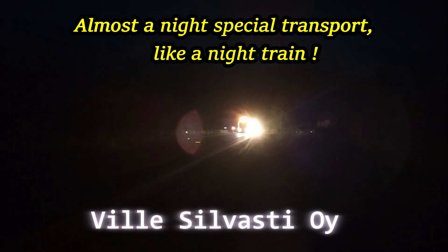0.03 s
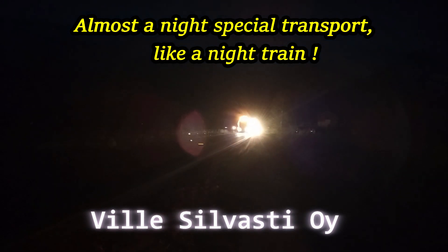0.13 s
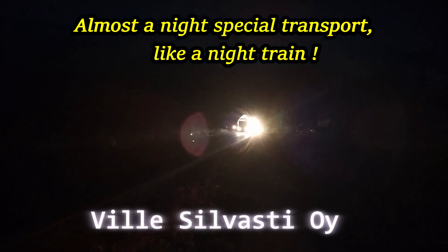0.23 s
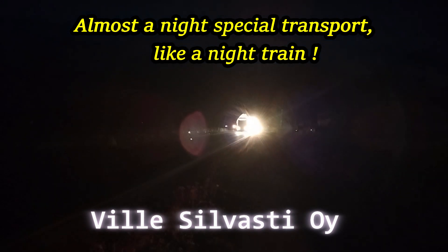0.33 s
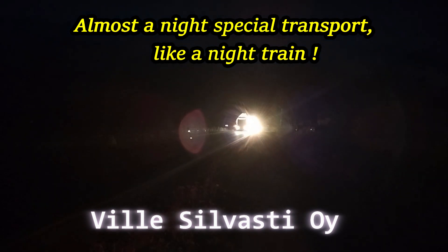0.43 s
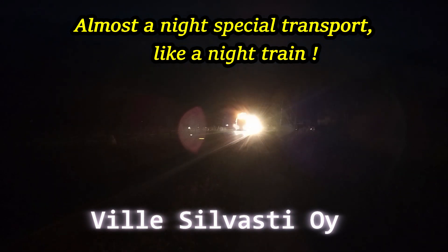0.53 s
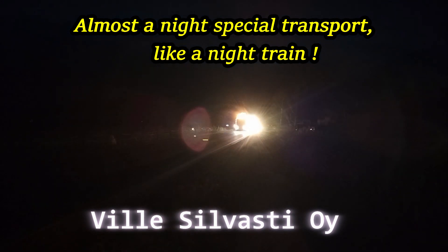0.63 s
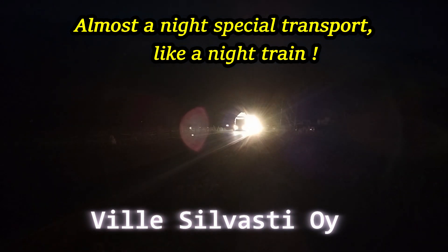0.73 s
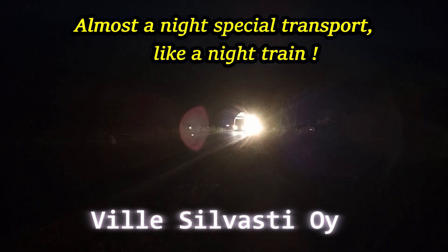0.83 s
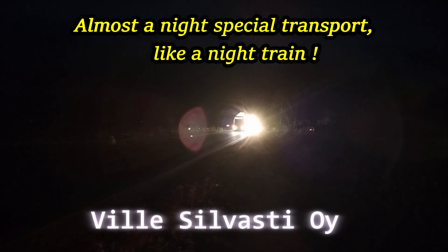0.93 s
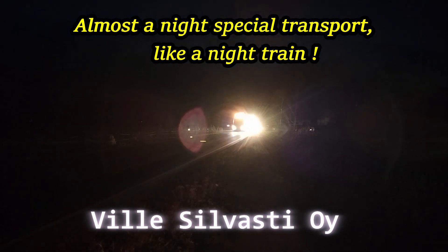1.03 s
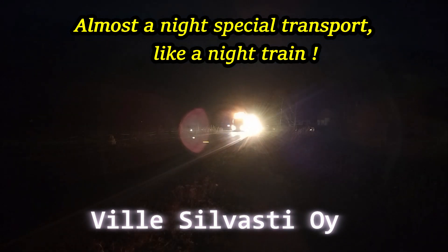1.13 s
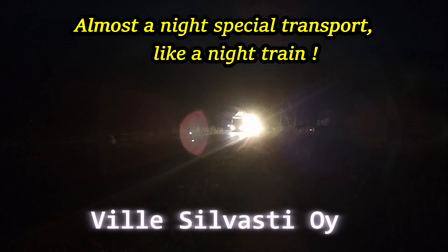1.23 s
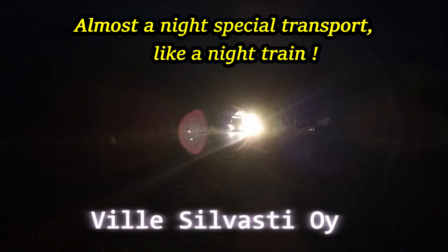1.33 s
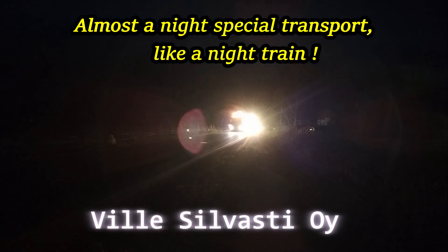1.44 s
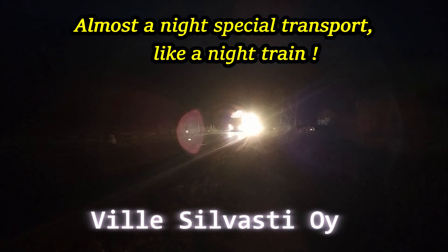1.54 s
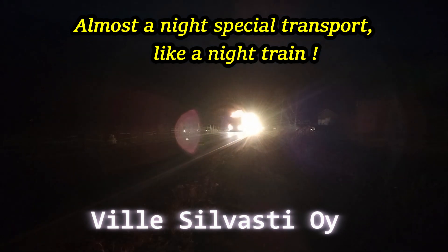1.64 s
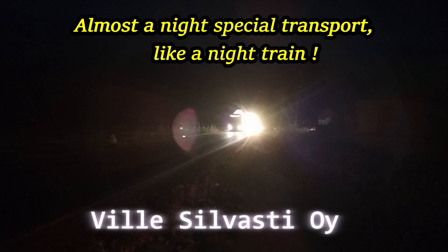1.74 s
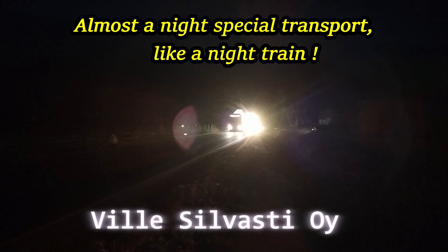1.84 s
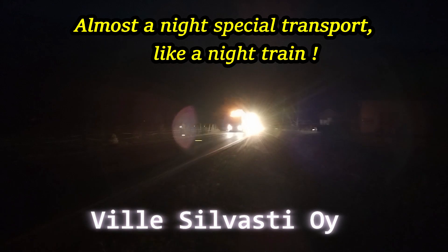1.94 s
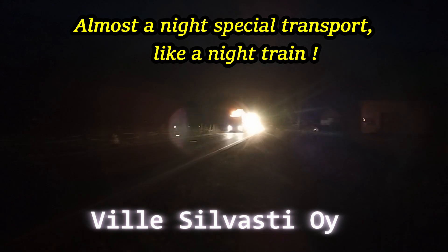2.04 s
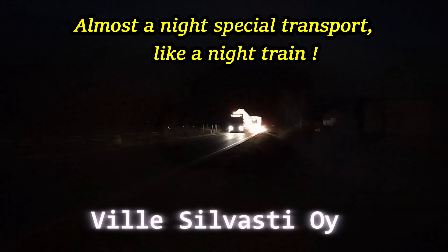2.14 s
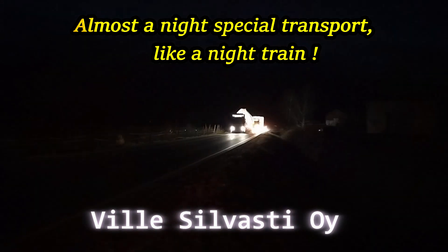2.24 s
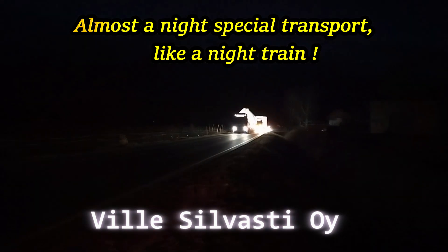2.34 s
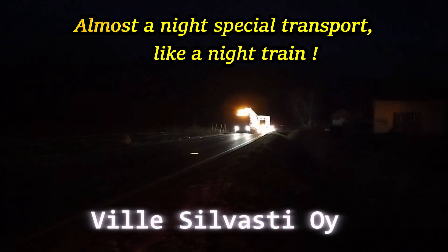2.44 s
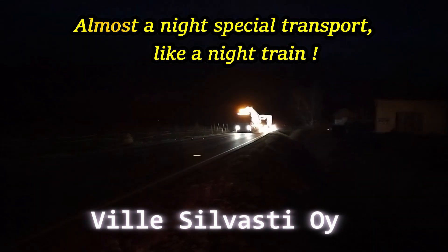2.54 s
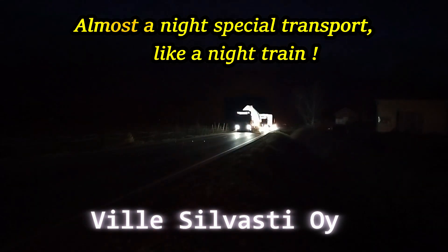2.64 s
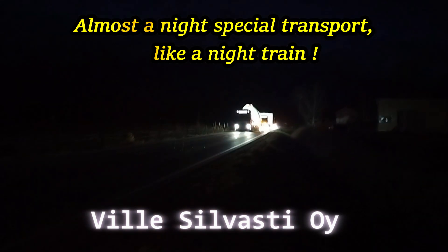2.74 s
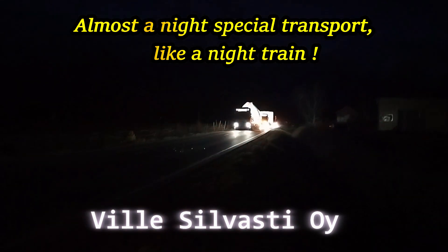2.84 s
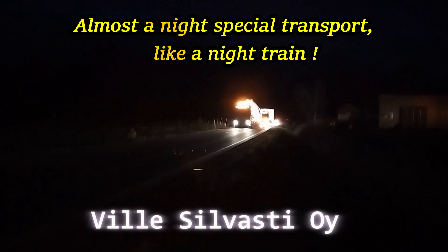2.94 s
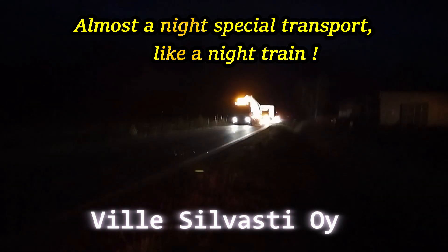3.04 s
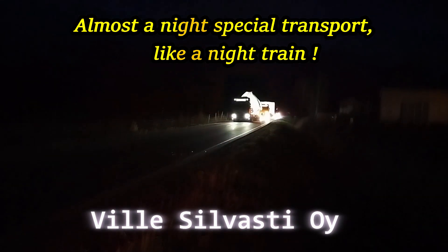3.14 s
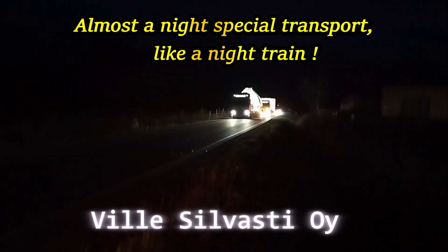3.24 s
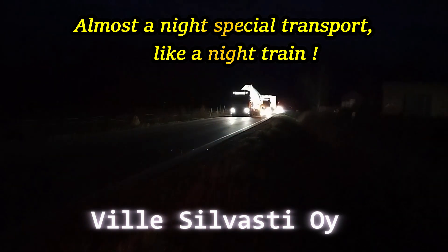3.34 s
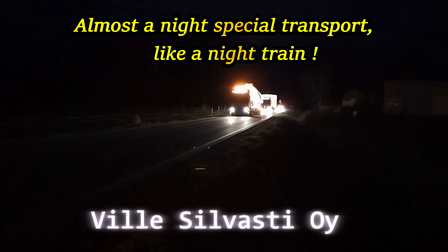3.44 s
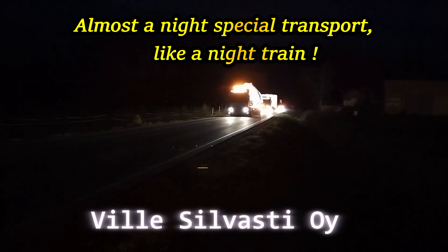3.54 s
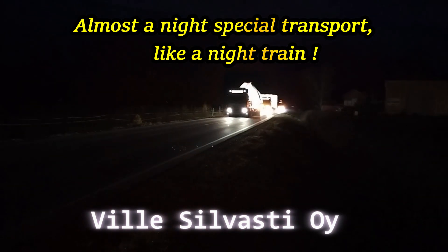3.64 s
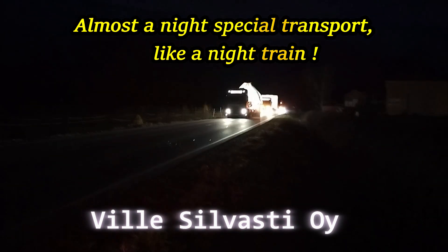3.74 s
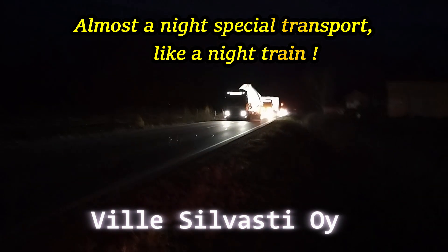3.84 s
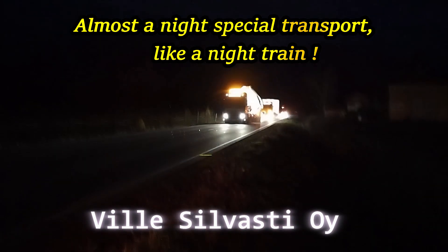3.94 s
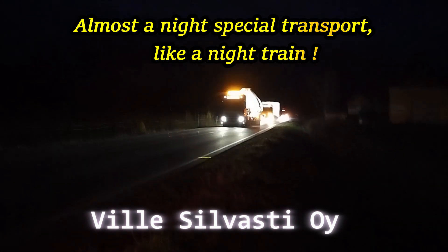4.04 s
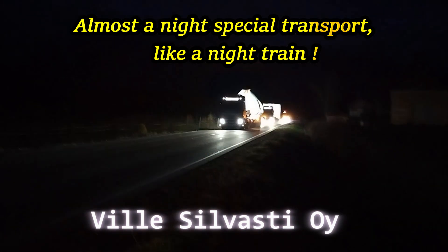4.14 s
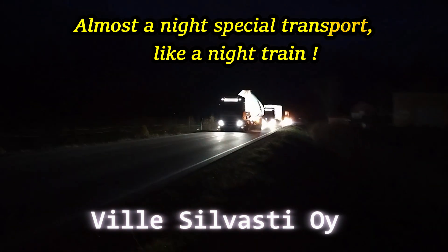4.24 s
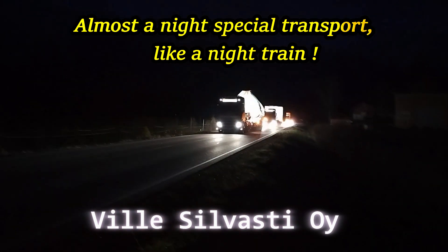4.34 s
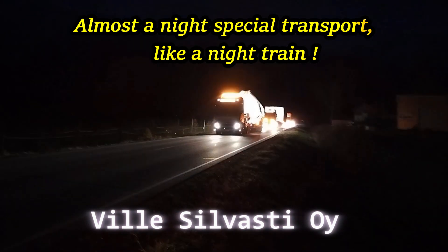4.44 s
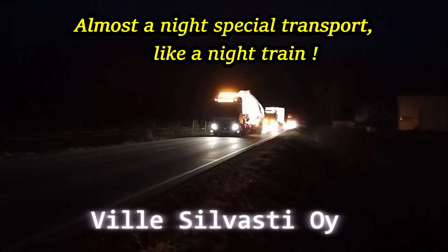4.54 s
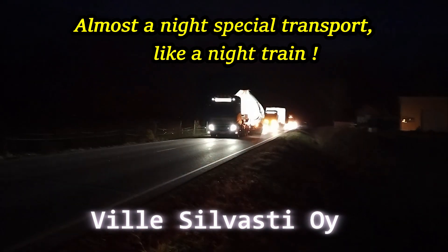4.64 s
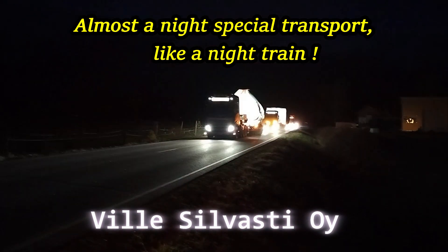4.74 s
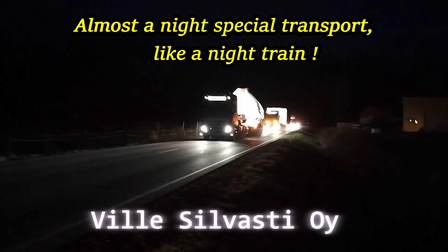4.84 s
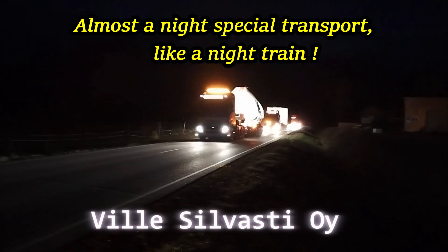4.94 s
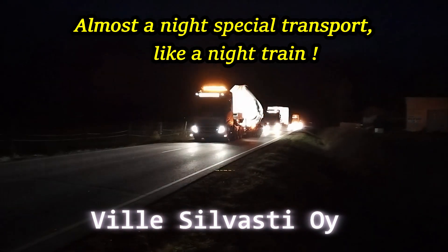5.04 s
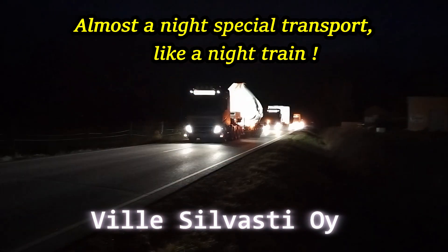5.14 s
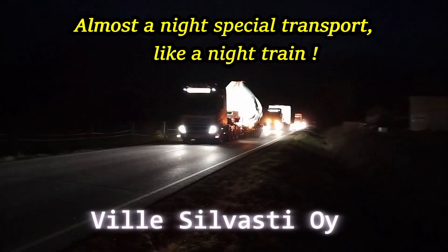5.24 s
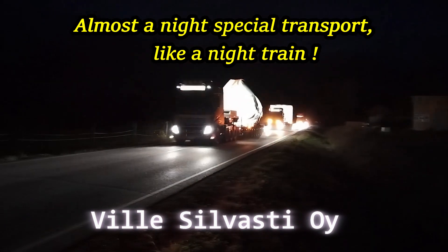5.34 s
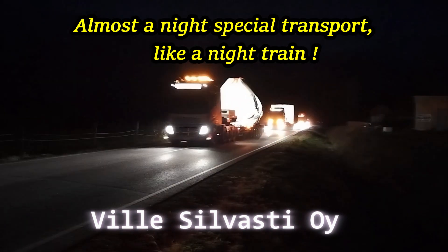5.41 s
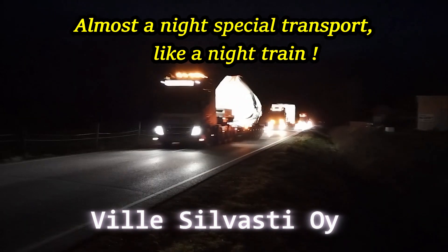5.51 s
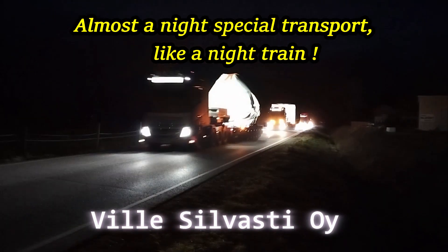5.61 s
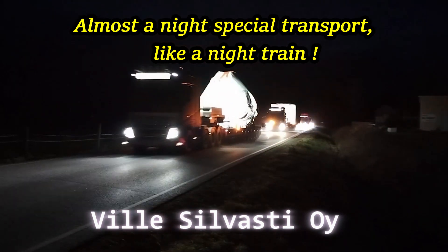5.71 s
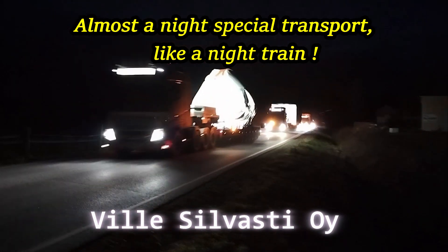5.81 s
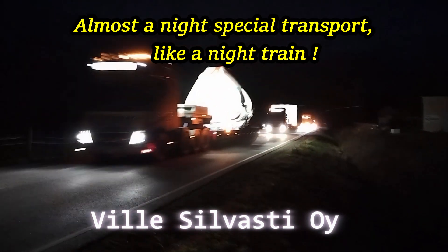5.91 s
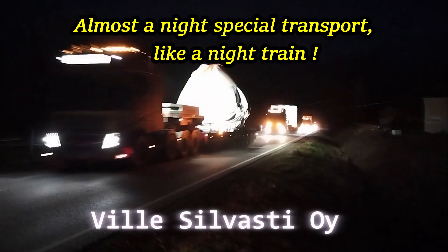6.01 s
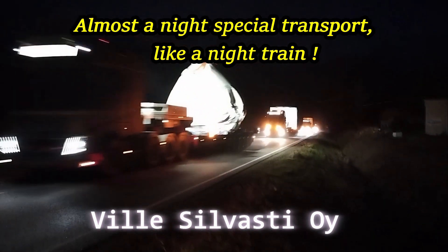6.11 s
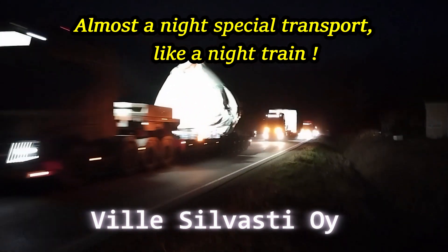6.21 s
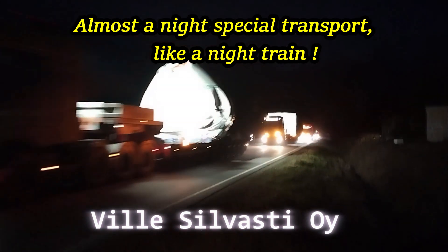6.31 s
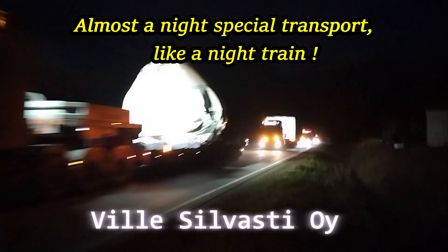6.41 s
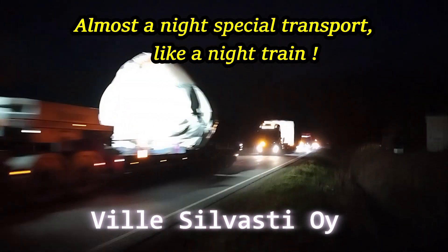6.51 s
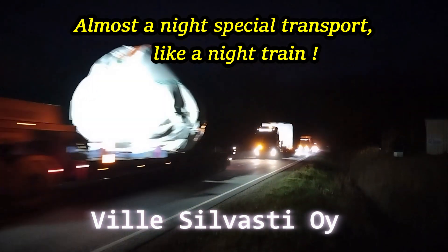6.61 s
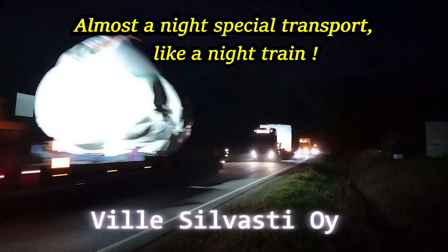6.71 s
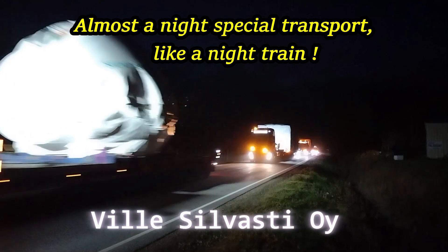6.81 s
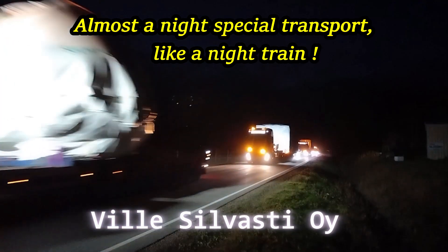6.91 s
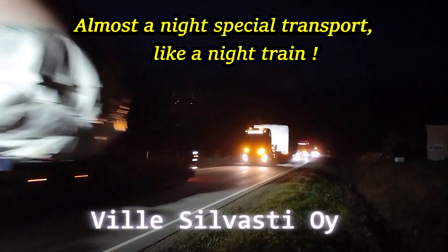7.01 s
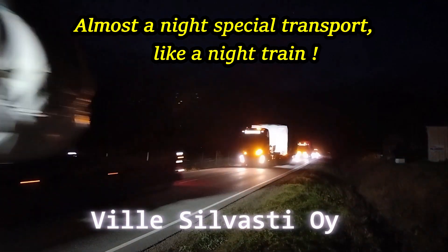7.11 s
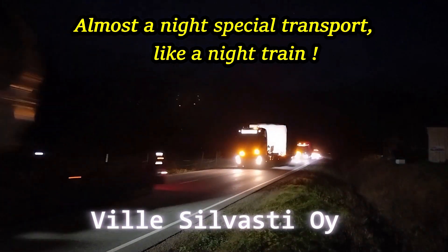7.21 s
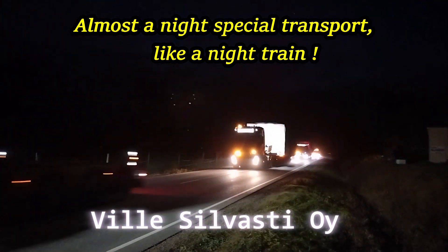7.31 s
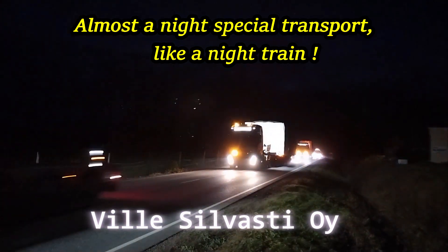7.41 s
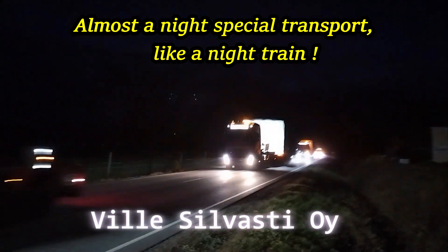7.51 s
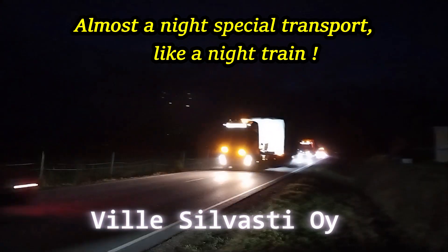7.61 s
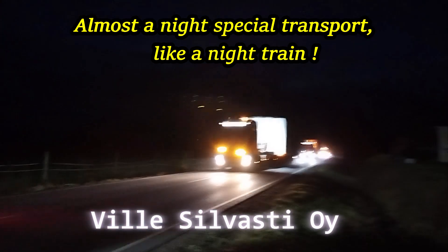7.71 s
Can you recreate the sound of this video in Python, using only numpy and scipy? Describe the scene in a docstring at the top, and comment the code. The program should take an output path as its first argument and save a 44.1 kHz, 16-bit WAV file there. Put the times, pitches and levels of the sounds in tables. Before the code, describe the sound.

Outdoors beside a country road, a handheld stereo microphone picks up distant vehicle roar, faint hiss and fluttering breeze with low wind thumps. A heavy truck with an oversized load grows steadily louder, its tyres roaring and hissing on asphalt. It rushes past very close and swings left, with tyre whine, brief whistles and a thin squeak falling in pitch, then its wake tears noisily across the microphone.

```python
"""A heavy truck with an oversized load approaches on a country road at night: shaped noise for its tyres,
Doppler-shifted sines for its hum, over the steady roar of vehicles far behind and the microphone's hiss. A
freshening breeze flutters at two microphone ports as modulated noise; single eddies thump them as pulses. Then
the tread whines as a harmonic series, stones tick, and wheel whistles and a trailer squeak sink in pitch. Last,
the load's wake strikes the ports as buffeting noise and short bursts while the truck's level dips sharply."""
import sys
import numpy as np
from scipy.fft import rfft, irfft, next_fast_len
from scipy.io import wavfile
from scipy.ndimage import map_coordinates

SR = 44100
rng = np.random.default_rng(int(sys.argv[2]) if len(sys.argv) > 2 else 0)


def unload_audio(sound):
    """Save the sound as a 16-bit wav file, at the path given as the first command line argument."""
    columns = np.transpose(np.atleast_2d(sound))
    # keep every value between -1 and 1, then stretch to whole-number steps
    steps = np.round(np.clip(columns, -1, 1) * 32767)
    wavfile.write(sys.argv[1], SR, steps.astype(np.int16))


N = 342216


def amp(db):
    """Level law: decibels to an amplitude ratio."""
    return 10 ** (np.asarray(db) / 20)


def unit(x):
    """Normalisation to an rms value of 1."""
    return x / np.sqrt(np.mean(x ** 2) + 1e-20)


def clock():
    """Sampling: the time of each sample in seconds."""
    return np.arange(N) / SR


def along(points, hz):
    """Interpolation of (f/Hz, value) points on a logarithmic frequency axis."""
    f, v = np.transpose(points)
    return np.interp(np.log(hz + 1), np.log(f + 1), v)


def curves(rows):
    """Linear interpolation in time: one value per sample for each column after t/s."""
    s, *columns = np.transpose(rows)
    return [np.interp(clock(), s, column) for column in columns]


def bell(s, spread):
    """Gaussian envelope of height 1 around time s."""
    return np.exp(-((clock() - s) / spread) ** 2)


def wobble(rate):
    """Slow random modulation: a curve of rms 1 with rate knots a second."""
    count = int(N * rate / SR) + 2
    return unit(np.interp(clock() * rate, np.arange(count), rng.standard_normal(count)))


def filtered(x, response):
    """Linear filtering: the spectrum of x times a response of frequency."""
    m = next_fast_len(N + 8192)
    return irfft(rfft(x, m) * response(np.fft.rfftfreq(m, 1 / SR)), m)[..., :N]


def rush(spectrum, alike=((100, 0),)):
    """Partially correlated noise: two ports share mid and differ by side; shaped spectrum, rms 1."""
    def response(hz):
        turn = np.arccos(np.clip(along(alike, hz), -1, 1)) / 2  # correlation as an angle
        return amp(along(spectrum, hz)) * np.array([np.cos(turn), np.sin(turn)])

    mid, side = filtered(rng.standard_normal((2, N)), response)
    return unit(np.array([mid + side, mid - side]))


def panned(db):
    """Level difference: left and right gains of mean power 1 for a left minus right level."""
    gains = amp(np.array([[1], [-1]]) * db / 2)
    return gains / np.sqrt(np.mean(gains ** 2, axis=0))


def turbulence(spectrum, rate, lumpy_db):
    """Intermittency: air noise at the ports comes in lumps, only loosely related from port to port."""
    lumps = np.tanh(np.array([wobble(rate), wobble(rate)]) / 2) * 2  # soft limits
    return unit(rush(spectrum, [(100, 0.25)]) * amp(lumpy_db * lumps))


SPEED, DISTANCE = 17, 7  # m/s, m at closest approach
# wheel groups, tractor then trailer: closest t/s, then roar, hiss and sizzle level/dB there before trims
WHEELS = [(6.5, -17, -20.9, -34.5), (7.35, -20.5, -27.5, -40.5)]
# spreading loss of roar, hiss and sizzle: level/dB per tenfold distance
SPREADING_DB = (20, 21.5, 19.5)
# excess loss of roar, hiss and sizzle in air and verge: level/dB per metre
AIR_DB_PER_M = (-0.0026, 0.0162, 0.1)


def tyre_levels():
    """Spreading and absorption: each wheel group fades and dulls with distance; their powers add."""
    power = 0
    for closest_s, *closest_db in WHEELS:
        metres = np.hypot(SPEED * (closest_s - clock()), DISTANCE)
        spreading_db = np.outer(SPREADING_DB, np.log10(metres / DISTANCE))
        excess_db = np.outer(AIR_DB_PER_M, metres - DISTANCE)
        power = power + amp(np.array(closest_db)[:, None] - spreading_db - excess_db) ** 2
    return 10 * np.log10(power)


# share of the near side in view: t/s, share (0-1)
NEARNESS = [(0, 0.01), (4.5, 0.06), (5.6, 0.19), (6.3, 0.87), (7.4, 1)]
# tyre noise spectra ahead (FAR) and alongside (NEAR): f/Hz, level/dB per Hz
ROAR_FAR = [(150, -23), (230, -11.5), (310, -19.5), (380, -8), (440, -1), (500, -4.5), (590, -8),
            (710, -0.5), (860, 0), (1030, -7.5), (1230, -1), (1450, -12.5), (1700, -13), (2300, -50),
            (5000, -90)]
ROAR_NEAR = [(110, -25), (170, -0.5), (240, -7.5), (300, -11), (380, -7.5), (460, -3.5), (530, -3),
             (660, 2), (790, -6), (960, 1.5), (1120, -8), (1300, -2), (1650, -15.5), (2300, -39),
             (5000, -90)]
HISS_FAR = [(940, -27), (1600, 2), (1820, -8.5), (1970, -1), (2180, -8.5), (2340, -3.5), (2510, -6.5),
            (2700, -3.5), (3470, -6), (5200, -25), (6760, -72), (11400, -120)]
HISS_NEAR = [(900, -39), (1600, -3), (2150, 2.5), (2500, -2), (3400, 0), (4000, -4.5), (4400, -11.5),
             (5200, -17), (7000, -50), (12000, -90)]
SIZZLE_FAR = [(4000, -35), (4900, -1), (5600, -7), (6400, 1.5), (8000, -7), (9500, -2), (11000, -13),
              (13500, -19), (15000, -42)]
SIZZLE_NEAR = [(4000, -18), (4900, 0), (5600, 0), (6400, 2.5), (8000, -6.5), (9500, -5), (11000, -10),
               (13500, -13), (15500, -21)]
# likeness of the two ports: f/Hz, correlation (clipped to 1)
ALIKE = [(200, 1.1), (500, 0.9), (800, 0.9), (1300, 0.5), (2500, 0), (4000, 0.46), (5500, -0.08),
         (12000, 0.2)]


def tyres(roar_db, hiss_db, sizzle_db):
    """Broadband tyre noise on asphalt: the spectrum crossfades in power as the near side comes into view."""
    near = np.clip(curves(NEARNESS)[0], 0, 1)

    def view(far_colour, near_colour):
        return np.sqrt(1 - near) * rush(far_colour, ALIKE) + np.sqrt(near) * rush(near_colour, ALIKE)

    texture = wobble(45)  # the road's grain shakes the treble together
    roar = amp(roar_db + 0.6 + 0.5 * wobble(12) + 0.9 * wobble(65)) * view(ROAR_FAR, ROAR_NEAR)
    hiss = amp(hiss_db + 1 + 0.5 * texture) * view(HISS_FAR, HISS_NEAR)
    sizzle = amp(sizzle_db + 1 + 1.12 * texture) * view(SIZZLE_FAR, SIZZLE_NEAR)
    return roar + hiss + sizzle


def doppler(closest_s):
    """Doppler effect: the pitch ratio follows the speed towards the listener as a source drives past."""
    ahead = SPEED * (closest_s - clock())
    return 1 / (1 - SPEED / 343 * ahead / np.hypot(ahead, DISTANCE))


PASS_S = 6.98  # closest approach of the truck (s)
HUM_WAVER = 0.5  # phase modulation (radians)
# drivetrain tones: f/Hz at rest, level/dB against the untrimmed roar, swell level/dB, swell t/s, spread/s
HUM = [(235.4, -20, 9, 7.1, 2.2), (423.5, -18, 6, 6.6, .45), (470.8, -19, 10.5, 6.68, .22),
       (541, -32, 18, 6.55, .3), (628, -30, 16, 6.6, .22), (615, -30, 14, 7.1, .2), (687, -18, 2, 7.15, .2),
       (706.2, -30, 19, 6.88, .2), (995, -30, 13, 7.2, .15), (1241, -19, -3, 7, 1)]


def hum():
    """Tonal drivetrain radiation: Doppler-shifted sines, each with its own change of level on passing."""
    turns = np.cumsum(doppler(PASS_S)) / SR
    out = 0
    for hz, approach_db, swell_db, s, spread in HUM:
        level = amp(approach_db + swell_db * bell(s, spread) + 2.15 * wobble(18))
        out = out + level * np.sqrt(2) * np.sin(2 * np.pi * hz * turns + HUM_WAVER * wobble(20))
    return out


# the truck's level dips sharply under the wake's blasts and partly recovers: t/s, level/dB
TRUCK_DIP = [(7.45, 0.5), (7.56, -2.5), (7.63, -12.5), (7.67, -12), (7.76, -8)]
# swing round to the left: t/s, delay/s of the right port
BEARING = [(5.6, .00001), (6.1, 0.000047), (6.45, .00013), (6.75, 0.00017), (7.05, 0.00026), (7.4, .00026)]
# balance of the ports: f/Hz, left minus right level/dB
BALANCE_DB = [(200, -1.5), (420, 1.5), (700, -2), (1200, 0), (1700, 0.5), (2380, -4), (3200, -10.5),
              (4300, -1.5), (5600, -0.5), (7200, -1), (9300, -17), (12000, -11), (15000, -1)]
SHADOW_HZ, SHADOW_LAG = 1130, 1.75  # above this f/Hz sound rounds the microphone body, delay times this


def truck():
    """Interaural-style delay: tyres and drive reach the right port later as they move left, treble latest."""
    roar_db, hiss_db, sizzle_db = tyre_levels()
    sources = tyres(roar_db, hiss_db, sizzle_db) + amp(roar_db) * hum() + tread_whine()
    sound = sources * amp(curves(TRUCK_DIP)[0])
    left, right = filtered(sound, lambda hz: panned(along(BALANCE_DB, hz)))
    bass = filtered(right, lambda hz: hz < SHADOW_HZ)
    delay = curves(BEARING)[0]

    def late(x, s):
        return map_coordinates(x, [(clock() - s) * SR], order=5)

    return np.array([left, late(bass, delay) + late(right - bass, SHADOW_LAG * delay)])


# dull roar of the far vehicles: f/Hz, level/dB per Hz
CONVOY = [(190, -44), (330, -11.5), (406, -8), (487, -9), (530, -7.5), (651, -12), (675, -6.5), (861, -2.5),
          (1010, -9), (1050, -15), (1120, -8), (1250, -18.5), (1620, -18), (2250, -18.5), (3310, -13.5),
          (4880, -31), (6000, -35), (7800, -63), (13200, -120)]
# their steady tones: f/Hz, level/dB
CONVOY_TONES = [(495.3, -52), (872, -53)]


def convoy():
    """Incoherent superposition: far vehicles merge into one slightly drifting roar with faint tones."""
    tones = 0
    for hz, db in CONVOY_TONES:
        level = amp(db + 1.6 * wobble(6))
        tones = tones + level * np.sqrt(2) * np.sin(2 * np.pi * hz * clock() + HUM_WAVER * wobble(8))
    roar = amp(-40.3 + 1.1 * wobble(5)) * rush(CONVOY, ALIKE)
    return filtered(roar + tones, lambda hz: panned(along(BALANCE_DB, hz)))


# flutter spectrum: f/Hz, level/dB per Hz
FLUTTER = [(15, -10), (30, -2.5), (60, 0.5), (95, 0), (125, 3.5), (165, -4), (220, -13.5), (320, -25.5),
           (600, -44), (3000, -100)]
# gusts: t/s, level/dB, spread/s
GUSTS = [(0.11, -29, .04), (0.29, -28, 0.036), (0.47, -31, .05), (1.05, -34, .12), (1.42, -33.5, 0.14),
         (1.88, -28.5, 0.18), (2.42, -31, 0.1), (2.76, -27.5, .08), (3.17, -29.5, 0.11), (3.76, -29, 0.08),
         (4.6, -27, .12), (5.1, -25.5, .2), (5.85, -26, .15), (6.45, -21.5, 0.29)]
# flutter balance: f/Hz, left minus right level/dB
BREEZE_SIDE_DB = [(30, 3), (70, -3.5)]
BREEZE_DB, FRESHEN_DB_PER_S, SWELL_DB = -35, 1.98, 1.5  # at the start (dB), rise (dB/s), chance swell (dB)


def breeze():
    """Turbulent pressure at the ports: a freshening breeze and gusts add in power."""
    steady = amp(BREEZE_DB + FRESHEN_DB_PER_S * clock() + SWELL_DB * wobble(9))
    gusts = sum((amp(db) * bell(s, spread)) ** 2 for s, db, spread in GUSTS)
    flutter = turbulence(FLUTTER, rate=24, lumpy_db=1.5)
    balanced = filtered(flutter, lambda hz: panned(along(BREEZE_SIDE_DB, hz)))
    return np.sqrt(steady ** 2 + gusts) * balanced


# self-noise spectrum: f/Hz, level/dB per Hz
SELF_NOISE = [(3000, -8), (4800, -1), (6000, -4), (8000, 5.5), (9100, 8), (10500, 1.5), (12000, 11.5),
              (12800, 0), (13600, 9.5), (14600, -1), (15500, 2)]


def microphone_hiss():
    """Self-noise: a stationary random hiss, stronger at the right port."""
    return amp(-53.5) * rush(SELF_NOISE) * panned(-15.0)


# thumps at a port: t/s, level/dB, spectral peak f/Hz, left minus right level/dB
EDDIES = [(.704, -12.5, 120, -16), (.944, -19, 105, -17), (1.265, -13, 150, -18), (1.806, -13, 135, -19),
          (2.065, -12, 125, -18), (2.083, -17.5, 240, -19), (2.576, -14, 135, -17), (2.595, -13, 270, -21),
          (3.264, -15.5, 130, -15), (3.28, -16, 210, -12.5), (3.462, -15, 129, -19), (3.482, -13, 145, -17),
          (3.599, -17, 160, -17), (4.156, -10, 126, -15), (4.56, -13, 135, -11), (4.582, -14, 150, -11),
          (4.906, -10, 125, -10.5), (5.178, -13.5, 110, -17), (5.406, -6, 165, -15), (6.031, -7, 165, -6)]
# ragged rim spectrum: f/Hz, level/dB per Hz
SCUFF = [(90, -7), (200, 7), (330, -1), (500, -12), (800, -16), (1500, -33), (4000, -90)]
EDDY_SPREAD_S = 0.011  # of the ragged rim and the trail
EDDY_REBOUND = 0.68  # lopsidedness: the pressure overshoots after the dip (radians)


def eddies():
    """Vortex pressure pulse: a sharp dip and a rebound, with a ragged rim and a short trail of noise."""
    out, trail, rim = np.zeros((2, N)), rush(FLUTTER), rush(SCUFF)
    for s, db, hz, pan_db in EDDIES:
        u = 2 * np.pi * hz * (clock() - s) / 3  # scaled so that the spectrum peaks at hz
        dip = -(np.exp(1j * EDDY_REBOUND) / (1 - 1j * u) ** 4).real
        rim_noise = 0.11 * rim * bell(s, EDDY_SPREAD_S)
        trail_noise = 0.22 * trail * bell(s + EDDY_SPREAD_S, EDDY_SPREAD_S)
        out += amp(db) * (dip + rim_noise + trail_noise) * panned(pan_db)
    return out


# axles: closest t/s, tread block rate f/Hz before Doppler shift, level/dB
AXLES = [(6.7, 318.5, -1), (6.88, 318, -3), (7.01, 317, -1), (7.55, 299, -7)]
# tread overtones: multiple of the block rate, level/dB
TREAD = [(2, -36), (3, -45), (4, -40), (6, -42), (7, -40), (8, -39), (9, -39), (10, -41), (11, -39),
         (12, -41), (13, -48), (14, -48), (15, -48), (17, -52), (19, -52)]
BEAM_S = 0.38  # an axle's whine is heard over this spread (s)
BEAM_LEAD = 0.65  # it peaks this share of the spread before the axle is closest
TREAD_FLICKER_DB = 4.5


def tread_whine():
    """Periodic impact: tread blocks slap the road; the harmonics glide down as each axle passes."""
    out = np.zeros((2, N), complex)
    for closest_s, blocks_hz, axle_db in AXLES:
        rate = blocks_hz * doppler(closest_s) * (1 + 0.0015 * wobble(90))
        phase = 2 * np.pi * np.cumsum(rate) / SR
        beam = bell(closest_s - BEAM_LEAD * BEAM_S, BEAM_S)
        for order, db in TREAD:
            level = amp(axle_db + db + TREAD_FLICKER_DB * np.minimum(wobble(22), 1)) * beam
            heard = level > 1e-4
            tone = level[heard] * np.exp(1j * (order * phase + 0.35 * wobble(60))[heard])
            out[:, heard] += tone * np.exp(0.4j * rng.standard_normal((2, 1)))  # path differs at each port
    return np.sqrt(2) * out.real


# stones flicked by the tyres: t/s, level/dB
GRIT = [(5.868, -37), (6.315, -29.5), (6.365, -34), (6.808, -31)]
# tick spectrum: f/Hz, level/dB per Hz
STONE = [(3000, -60), (5500, -15), (7000, -4), (8700, 0), (11000, -8), (15000, -22)]


def grit():
    """Impulsive excitation: each flicked stone is one tiny bright tick, stronger at the right."""
    return sum(amp(db) * bell(s, 0.003) for s, db in GRIT) * rush(STONE) * panned(-8)


# tread overtones flaring as wheels pass: t/s, f/Hz then, spread/s, level/dB before WHISTLE_DB,
# left minus right level/dB
WHISTLES = [(6.08, 1995, .11, -35, -3), (6.21, 2650, .09, -36, -11), (6.38, 1985, .15, -30.5, -1),
            (6.42, 2295, .12, -27.5, -5), (6.53, 4590, .07, -37, -3), (6.635, 3580, .045, -24.5, -9),
            (6.64, 2630, .11, -31, -8), (6.66, 2280, .1, -26.5, 3), (6.71, 5510, .05, -39, -10),
            (6.75, 1945, .05, -28, 3), (6.76, 3885, .065, -25, -4), (6.81, 3555, .08, -24, -8),
            (6.78, 6155, .05, -36.5, -5), (6.81, 2255, .045, -26.5, 10), (6.84, 2885, .075, -31, -5),
            (6.88, 1935, .045, -28, 7), (6.905, 3515, .055, -23.5, -9), (6.91, 4800, .035, -38, 0),
            (6.92, 5430, .055, -37.5, -2), (6.93, 2235, .06, -33, 6), (6.93, 4165, .06, -31.5, 1),
            (7.0, 1895, .09, -29.5, 0), (7.01, 4750, .035, -39, 2), (7.03, 3790, .055, -30.5, -2),
            (7.02, 6020, .07, -40, -2), (7.045, 4060, .02, -35, -1), (7.14, 5650, .05, -42, -12),
            (7.18, 2165, .06, -30.5, -7), (7.3, 2125, .08, -29.5, -8)]
# partials of a thin trailer squeak: the same columns
SQUEAK = [(7.135, 9020, .045, -40, -8), (7.15, 9460, .03, -41.5, -8), (7.12, 10300, .05, -47, -8),
          (7.17, 12100, .035, -49, -6), (7.14, 12860, .03, -50, -6), (7.15, 13750, .024, -46, -6),
          (7.14, 15120, .035, -53, -6)]
WHISTLE_DB = -2  # added to every whistle and squeak
WHISTLE_JITTER, WHISTLE_JITTER_PER_S = 0.008, 500  # pitch roughness (share), knots per s
WHISTLE_FLICKER_DB, WHISTLE_FLICKER_PER_S = 3, 80  # level flicker (dB), knots per s
WHISTLE_SCATTER = 0.55  # phase flicker at each port (radians)


def whistles(rows):
    """Transient tones: passing parts sing out briefly, rough in pitch and sinking by the Doppler effect."""
    out, t, shift = np.zeros((2, N)), clock(), doppler(PASS_S)
    for s, hz, spread, db, pan_db in rows:
        heard = np.abs(t - s) < 3 * spread
        age = t[heard] - s

        def chance(rate):
            return np.interp((age - age[0]) * rate, np.arange(rate), rng.standard_normal(rate))

        glide = shift[heard] / np.interp(s, t, shift)
        pitch = hz * glide * (1 + WHISTLE_JITTER * chance(WHISTLE_JITTER_PER_S))
        phase = 2 * np.pi * np.cumsum(pitch) / SR
        flicker_db = WHISTLE_FLICKER_DB * chance(WHISTLE_FLICKER_PER_S)
        level = amp(db + WHISTLE_DB + flicker_db) * np.exp(-(age / spread) ** 2)
        ports = np.array([phase + WHISTLE_SCATTER * chance(WHISTLE_FLICKER_PER_S) for _ in range(2)])
        out[:, heard] += np.sqrt(2) * level * np.sin(ports) * panned(pan_db)
    return out


# buffeting in the wake: t/s, level/dB
WAKE = [(7.2, -52), (7.42, -19.5), (7.47, -16.5), (7.535, -11.5), (7.59, -18.5), (7.625, -16),
        (7.66, -19.5), (7.7, -14), (7.76, -21)]
# buffet spectrum: f/Hz, level/dB per Hz
BUFFET = [(15, -9), (40, -2), (95, -3), (125, 5.5), (160, 5.5), (230, -2.5), (380, -4.5), (800, -27),
          (4000, -90)]


def wake():
    """Wake turbulence: air dragged behind the load buffets the ports and tears across them."""
    return amp(curves(WAKE)[0]) * turbulence(BUFFET, rate=60, lumpy_db=2) + blasts()


# tearing blasts: t/s, spread/s, level/dB, brightest f/Hz, left minus right level/dB
BLASTS = [(7.438, .003, -7.5, 780, 1), (7.444, .006, -15, 1500, -1), (7.457, .004, -16, 1600, 3),
          (7.467, 0.0044, -11.5, 1900, 1), (7.477, .004, -10, 1900, 1), (7.482, .003, -24, 5000, -5),
          (7.5, .013, -13, 2390, 0), (7.52, 0.062, -26.5, 4515, -8), (7.52, .015, -16, 4000, -9),
          (7.526, 0.0073, -12, 1900, 2), (7.55, 0.057, -17, 1300, 1), (7.547, .008, -14, 1900, 5),
          (7.565, 0.0066, -19.5, 3800, -6), (7.573, 0.011, -14, 2500, 3), (7.594, .006, -11, 1400, -6),
          (7.607, 0.0055, -16.5, 1890, -7), (7.622, 0.017, -18.5, 1300, 6), (7.634, 0.0036, -22, 1300, 3),
          (7.62, 0.033, -36.5, 5960, -12), (7.651, .0015, -28, 5500, -12), (7.671, 0.0013, -21, 3800, -8),
          (7.687, .005, -12, 1680, 14), (7.702, .007, -11, 1490, 9), (7.702, 0.013, -26.5, 4830, -14),
          (7.712, .006, -17, 910, 10), (7.733, 0.013, -18, 1900, 14), (7.735, 0.0046, -34, 5000, -8),
          (7.753, .008, -23, 1300, 8)]
TEAR_RISE, TEAR_FALL = 0.75, 4.16  # exponents of frequency: rise, and the fall divided into it above


def blasts(size=16384):
    """Shear bursts: shreds of the wake give short noise bursts, each with its own brightness and side."""
    out = np.zeros((2, N + size))
    age, freqs = (np.arange(size) - size // 2) / SR, np.fft.rfftfreq(size, 1 / SR)
    for s, spread, db, hz, pan_db in BLASTS:
        colour = (freqs / hz) ** TEAR_RISE / np.hypot(1, (freqs / hz) ** TEAR_FALL)
        shape = np.exp(-(age / spread) ** 2)
        burst = irfft(rfft(rng.standard_normal((2, size))) * colour) * shape
        burst *= np.sqrt(np.sum(shape ** 2) / np.sum(burst ** 2, axis=1, keepdims=True))  # equal energy
        start = round(s * SR) - size // 2
        out[:, start:start + size] += amp(db) * burst * panned(pan_db)
    return out[:, :N]


def scene():
    """Superposition of truck, far convoy, moving air and self-noise."""
    vehicles = truck() + convoy() + grit() + whistles(WHISTLES) + whistles(SQUEAK)
    return vehicles + breeze() + microphone_hiss() + eddies() + wake()


TOP_HZ = 15750  # upper band limit


def record(dry):
    """Saturation and band limiting: the highest peaks are rounded off, nothing passes above TOP_HZ."""
    clipped = dry / (1 + np.abs(dry) ** 8) ** (1 / 8)
    return filtered(clipped, lambda hz: np.clip((TOP_HZ - hz) / 200, 0, 1))


dry = scene()
out = record(dry)
unload_audio(out)
```